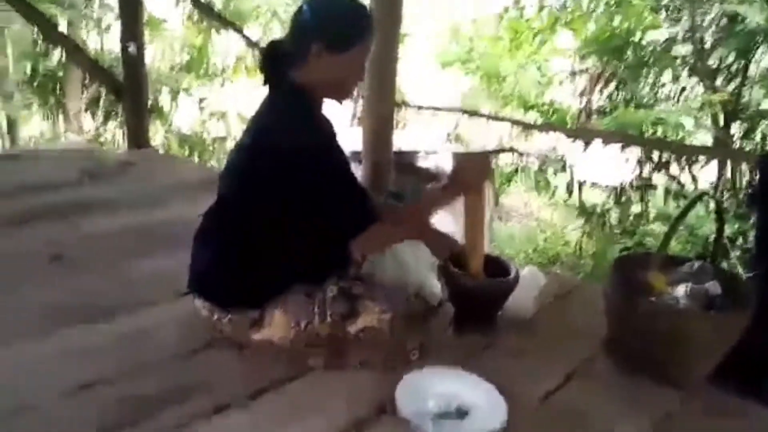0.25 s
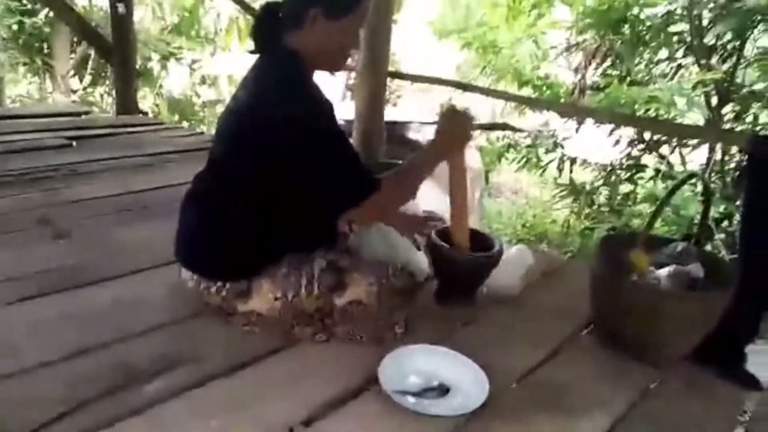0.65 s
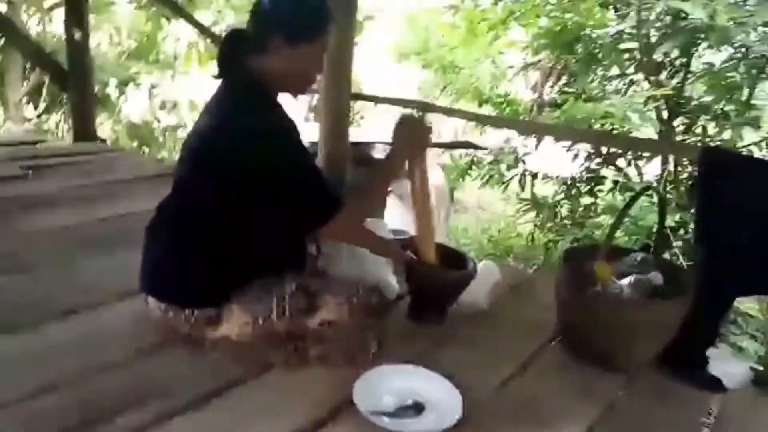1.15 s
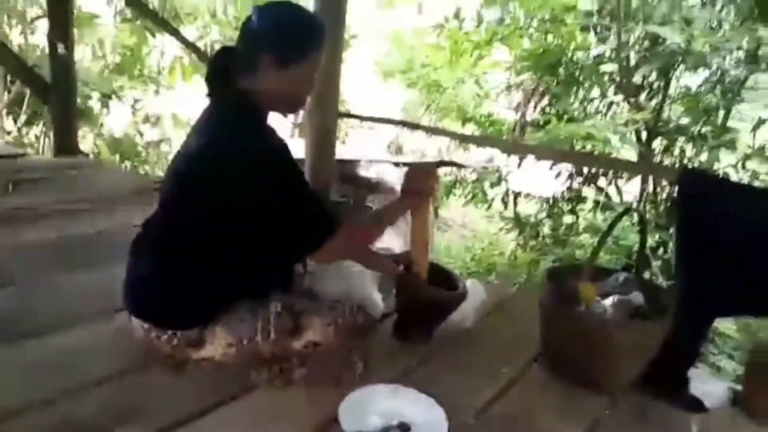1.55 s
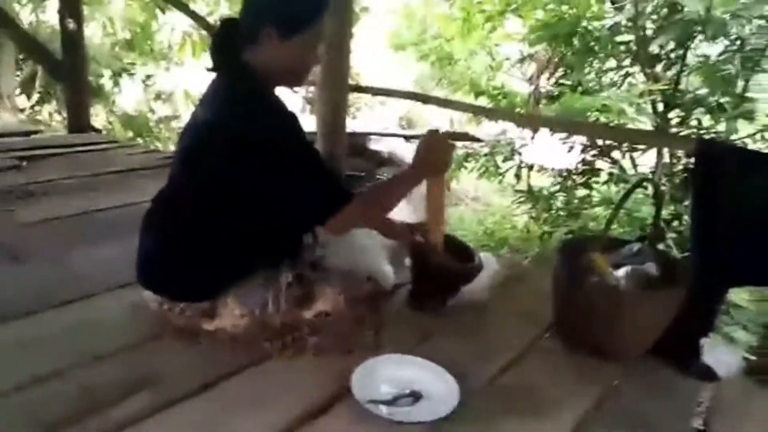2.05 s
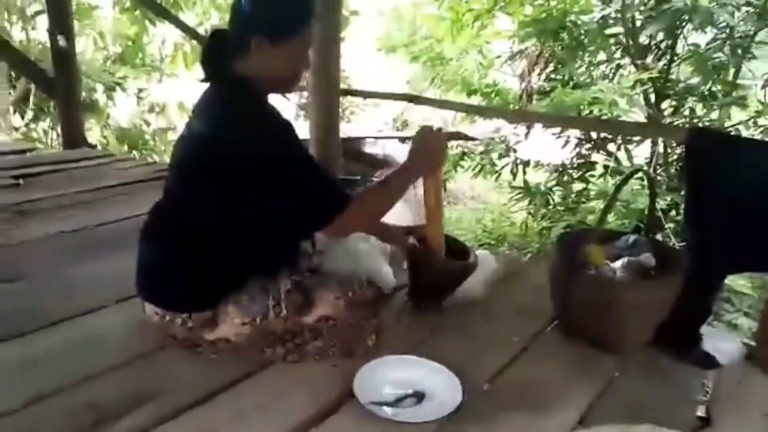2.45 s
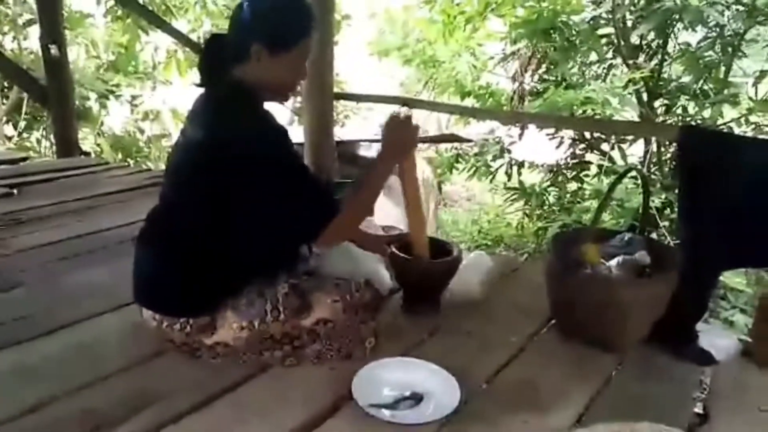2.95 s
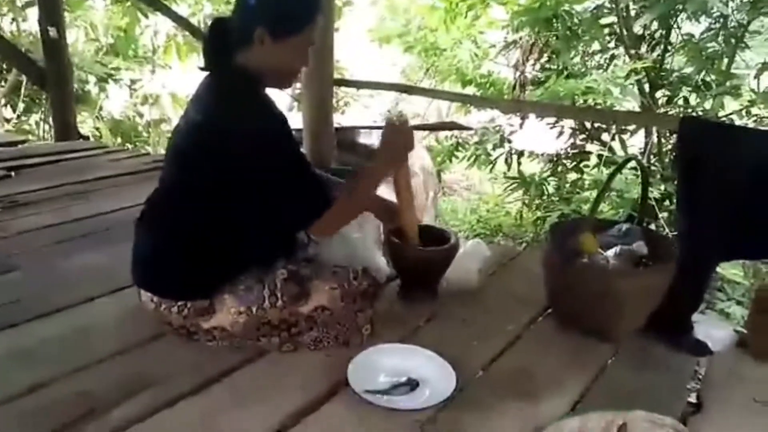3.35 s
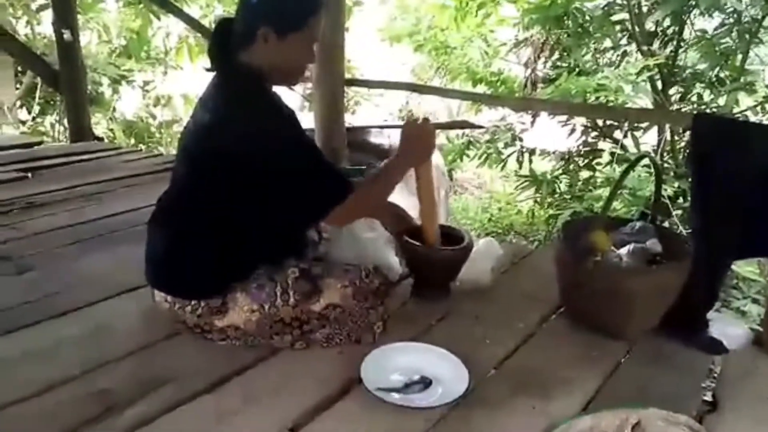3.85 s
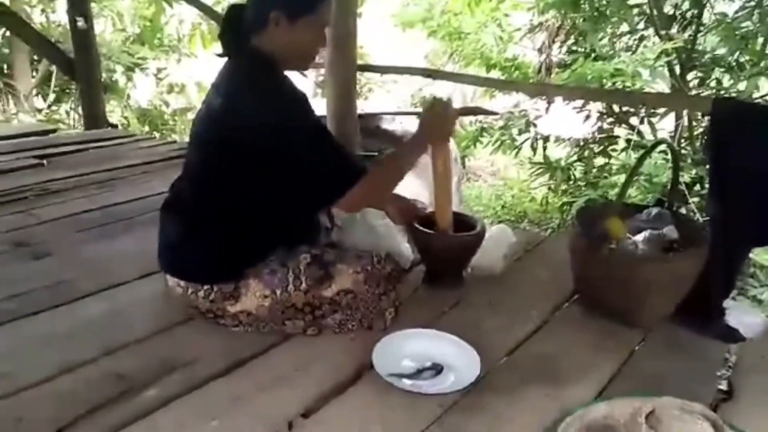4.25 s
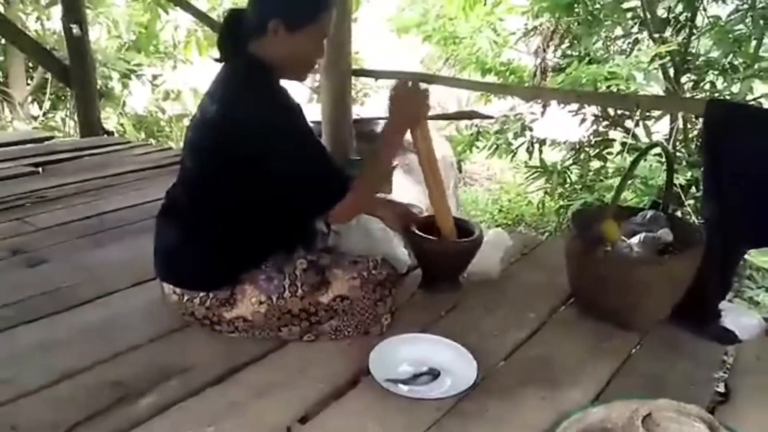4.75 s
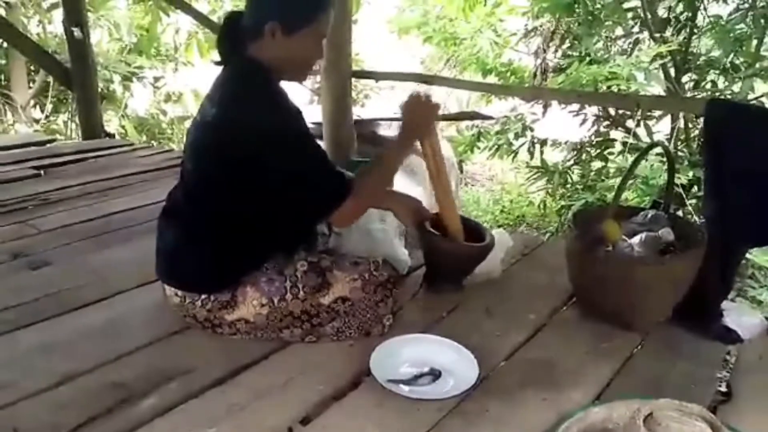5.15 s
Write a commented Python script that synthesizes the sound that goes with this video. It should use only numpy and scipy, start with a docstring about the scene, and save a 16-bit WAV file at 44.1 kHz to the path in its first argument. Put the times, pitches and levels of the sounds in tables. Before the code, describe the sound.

Close to a stereo microphone, slightly right, a wooden pestle pounds moist food in a clay mortar. About three strokes a second crunch and end in dull thuds that shake loose floor planks. Some strokes knock sharply on clay, loudest near 2.4 seconds. Fine grains hiss between blows; a tiny bird chirps far off in the later part, in quiet open air.

```python
"""Pounding food in a clay mortar

A wooden pestle pounds moist food on the plank floor of an open hut, a little right of the microphone pair.
Each stroke crunches through the food (bursts of tiny clicks) and ends in a thud (noise and board modes);
some strokes knock on the clay (mortar modes). Between strokes grains hiss as food settles, lifts or is scraped.
The roof gives a short echo (fading noise); a bird slurs far off (gliding sines); the air is faint noise."""
import sys
import numpy as np
from scipy import signal
from scipy.fft import rfft, irfft
from scipy.io import wavfile

SR = 44100
rng = np.random.default_rng(int(sys.argv[2]) if len(sys.argv) > 2 else 0)


def output_pcm(signal):
    """Save a mono or channel-first signal as 16-bit PCM at the path in sys.argv[1].

    Samples are clipped to [-1, 1] before scaling.
    """
    pcm = np.clip(np.atleast_2d(signal).T, -1, 1) * 32767
    wavfile.write(sys.argv[1], SR, np.round(pcm).astype(np.int16))


N = 238492
TIME = np.arange(N) / SR
AFTER = TIME[:SR // 2]   # time since a blow, s

# The pestle strokes. Each row: time the pestle meets the food in seconds, time to sink through it in seconds,
# entry crunch in dB, its treble in dB, deep crunch in dB, its treble in dB, entry jolt in dB,
# final thud in dB (before the shudder lift), thud softness cut in Hz, floor boom in dB, rustle of the lift in dB.
STROKES = [(0.621, 0.022, -46, 2, -44, -3.5, -44.5, -44, 1010, -49, -73.5),
           (0.990, .044, -67.5, 12, -54, 4.5, -66, -73, 500, -55.5, -96),
           (1.341, .042, -52, -11, -41.5, 4.5, -56, -39, 935, -42, -68.5),
           (1.718, .011, -41, 7.5, -41, -3, -53, -37.5, 650, -39, -65.5),
           (2.075, 0.015, -53, 12.5, -43, 5, -60, -43, 1100, -46.5, -76),
           (2.443, 0.025, -30, 3, -36.5, 6.5, -29.5, -42, 609, -48, -66),
           (2.790, .039, -55, 1, -43.5, -1.5, -44, -45, 720, -46.5, -74),
           (3.152, 0.024, -52.5, 2, -41, 4, -50, -38, 916, -48.5, -95),
           (3.502, 0.037, -57, 7, -48, 6, -66.5, -45, 1101, -45.5, -79),
           (3.847, .047, -54.5, 8.5, -47, 0, -52.5, -54.5, 666, -52.5, -75),
           (4.198, .038, -48, 1, -47.5, 12, -56, -48.5, 390, -49.5, -70.5),
           (4.568, .043, -48, -2.5, -44, -3.5, -51, -47, 440, -49.5, -71),
           (4.982, 0.021, -29.5, -1.5, -40.5, -4.5, -37.5, -40, 780, -48.5, -77),
           (5.348, 0.012, -37.5, -2.5, -37, -14, -52, -37.5, 805, -41, -76)]
# Light touches between strokes; the first row is the fading end of an earlier thud. Each row: start in seconds,
# crunch in dB, jolt in dB (before the shudder lift).
TOUCHES = [(0.002, -65, -59.5), (0.485, -54, -58), (1.123, -60.5, -65), (1.685, -63, -80),
           (2.243, -66, -73), (3.091, -61, -50.5), (3.255, -59, -58.5), (3.698, -63, -65.5),
           (4.005, -65.5, -78), (4.31, -56, -68), (5.249, -70, -55.5)]
# Spectrum of crushed food close by. Each row: frequency in Hz, relative density in dB per Hz.
CRUNCH_COLOUR = [(100, -10), (300, -1.5), (800, -1), (1400, -0.5), (2300, 3), (3200, -1), (4500, -1.5),
                 (6500, 0), (9000, -4), (11000, -17), (13000, -26.5)]
# Spectrum of sliding food and dry snaps. Each row: frequency in Hz, relative density in dB per Hz.
RUSTLE_COLOUR = [(100, -5.5), (400, 4.5), (1200, 2.5), (2400, 6), (3600, 3), (6500, 3.5), (9500, 1),
                 (11500, -7), (13000, -16.5)]


def crunches(split_hz=3000):
    """The food cracks as the pestle enters; fibres burst in a deep swell as it sinks in, then die away."""
    entry_swell_s, entry_t60 = .005, 0.12   # the skin of the food gives at once
    crush_swell_share, crush_t60 = 0.46, .125   # swell as a share of the sinking time; decay in s
    touch_t60, touch_treble_db = 0.092, 1.5
    burst = grains(CRUNCH_COLOUR, per_s=3500, spread_db=3.0, shift_db=2.0, clump_db=2.24)
    coarse = low_pass(burst, split_hz, order=1)
    fine = burst - coarse

    # each burst: peak s, level dB, swell s, t60 s, treble dB
    bursts = [(s + entry_swell_s, level_db, entry_swell_s, touch_t60, touch_treble_db)
              for s, level_db, _ in TOUCHES]
    for s, sink, entry_db, entry_treble_db, crush_db, crush_treble_db, *_ in STROKES:
        bursts.append((s + entry_swell_s, entry_db, entry_swell_s, entry_t60, entry_treble_db))
        bursts.append((s + sink, crush_db, crush_swell_share * sink, crush_t60, crush_treble_db))

    coarse_power, fine_power = np.zeros(N), np.zeros(N)
    for s, level_db, swell_s, t60, treble_db in bursts:
        power = (from_db(level_db) * surge(s, swell_s, t60)) ** 2
        coarse_power += power
        fine_power += power * from_db(treble_db) ** 2
    return coarse * np.sqrt(coarse_power) + fine * np.sqrt(fine_power)


def grains(spectrum, per_s, spread_db, shift_db, clump_db):
    """Tiny uneven ruptures come in clumps; their colour shifts as the pestle moves through the bowl."""
    sizes_db = spread_db * np.minimum(rng.exponential(1, (4, N)), 4)
    sizes = from_db(sizes_db) * rng.choice([-1, 1], (4, N))
    happens = rng.random((4, N)) < per_s / SR
    clicks = (sizes * happens).reshape(2, 2, N)
    edges_hz = np.geomspace(90, 14000, 19)
    pair = 0
    for k, (low_hz, high_hz) in enumerate(zip(edges_hz, edges_hz[1:])):
        # neighbouring bands take different clicks, and each band drifts in level
        pair = pair + band_pass(clicks[k % 2], low_hz, high_hz) * from_db(shift_db * drift(45))
    coloured = stereo(*[colour(draw, spectrum) for draw in pair])
    return rms_one(coloured * from_db(clump_db * drift(260)))


def thuds(least_rise_s=0.0027, mash_t60=.11, plank_t60=0.2, plank_hz=350, boom_rise_s=.009,
          shudder_db=4.5, lowest_hz=42, highest_hz=1500):
    """The packed food stops the pestle: loose planks shudder, the floor booms, the mortar rocks back once."""
    # Modes of the plank floor. Each row: frequency in Hz, relative level in dB, t60 in seconds.
    boards = [(53, -11, 0.71), (70, -3.5, 0.31), (80, -4.5, 0.6), (115, -9.5, 0.53), (156, -11.5, 0.33),
              (219.3, -4.5, .2), (263.6, -12, 0.17)]
    # Spectrum of the shudder before softening. Each row: frequency in Hz, relative density in dB per Hz.
    thud_colour = [(40, -17.5), (100, -15.5), (160, -10), (225, 1.5), (280, -4), (350, -8.5), (550, -5),
                   (1000, -10), (3000, -3), (12000, -39)]
    stop_lag = 1.25   # the pestle comes to rest after this many sinking times
    stop_rise_share = 0.17   # the thud's build-up lengthens by this share of the sinking time
    rock_s, rock_db, rock_cut_hz, rock_boom_db = .066, -13, 380, -7.5   # delay, levels against the thud

    boom = 0
    for k, (hz, db, t60) in enumerate(boards):
        boom = boom + from_db(db) * np.sin(2 * np.pi * hz * AFTER) * fade(AFTER, t60) * (-1) ** k
    boom = boom * (1 - np.exp(-AFTER / boom_rise_s))
    boom = band_pass(boom, lowest_hz, highest_hz)   # the boom is kept out of the deepest bass

    # each blow: start s, level dB, softness cut Hz, boom dB, rise s
    blows = [jolt(s, jolt_db) for s, _, jolt_db in TOUCHES]
    for s, sink, *_, jolt_db, thud_db, soft_hz, boom_db, _ in STROKES:
        stop = s + stop_lag * sink
        rise_s = least_rise_s + stop_rise_share * sink
        blows.append(jolt(s, jolt_db))
        blows.append((stop, thud_db, soft_hz, boom_db, rise_s))
        blows.append((stop + rock_s, thud_db + rock_db, rock_cut_hz, boom_db + rock_boom_db, rise_s))

    out = np.zeros((2, N))
    for s, level_db, soft_hz, boom_db, rise_s in blows:
        shudder = low_pass(noise(thud_colour, len(AFTER)), soft_hz)
        shudder = shudder / np.std(shudder[:, :SR // 25])   # level set by the first 40 ms
        planks = low_pass(shudder, plank_hz, order=1)
        mash = shudder - planks
        body = planks * fade(AFTER, plank_t60) + mash * fade(AFTER, mash_t60)
        body = body * (1 - np.exp(-AFTER / rise_s))
        add(out, s, from_db(level_db + shudder_db) * body + from_db(boom_db) * boom)
    return out


def jolt(s, level_db, rise_s=0.0064):
    """A passing push on the mortar, brighter the harder it is: (s, level dB, softness cut Hz, boom dB, rise s)."""
    medium_db, medium_cut_hz, cut_factor_per_db = -49, 430, 1.08
    boom_db = level_db - 6
    cut_hz = medium_cut_hz * cut_factor_per_db ** (level_db - medium_db)
    return s, level_db, cut_hz, boom_db, rise_s


def knocks(scatter_db=0.5, crack_db=-7, crack_t60=.11, grit_db=3, contact_s=0.00092, belly_hz=650,
           focus_octaves=0.22):
    """Wood on clay rings the mortar's modes; a cushion of food makes the contact soft and dull."""
    # Pestle meets clay. Each row: start in seconds, level in dB, contact brightness cut in Hz,
    # lift of the belly modes in dB, favoured frequency in Hz, its lift in dB, ring length as a factor.
    strikes = [(0.484, -47.5, 8900, -21, 3100, 24, 0.27), (0.619, -47.5, 4030, 8.5, 2850, 20, 0.97),
               (1.3409, -23, 8100, -7.5, 3400, 13, 0.54), (1.348, -32.5, 2500, -6, 1500, 20, 0.47),
               (1.734, -37, 2600, -23, 1716, 15, 0.76), (2.4491, -15, 7000, 3, 2220, 7, 0.51),
               (2.4593, -23.5, 8000, -13.5, 4900, 16.5, 0.33), (2.469, -35.5, 9000, 7, 2800, 20.5, 0.45),
               (2.591, -46.5, 3480, -10, 2260, 11.5, 0.41), (2.789, -43.5, 2000, 1, 797, 15, 0.58),
               (3.154, -29.5, 2066, -1, 1500, 13.5, 0.92), (4.070, -56, 6060, -10, 1480, 10.5, 0.55),
               (4.198, -23.5, 6500, -10, 2530, 4, 0.69), (4.568, -46, 1730, 6.5, 776, 18.5, 0.66),
               (4.986, -32.5, 6000, 3.5, 4880, 6, 0.72), (5.363, -37.5, 1800, 9.5, 890, -10, 1)]
    # Modes of the mortar, damped by the food. Each row: frequency in Hz, level in dB before the lifts of
    # each knock, t60 in seconds before its ring factor.
    mortar = [(215, -16.5, 0.014), (565.6, -8, 0.093), (734.5, -20, 0.23), (778, -23, 0.37),
              (838, -11, 0.11), (950, -16.5, 0.069), (1083, -13, 0.11), (1268, -10.5, 0.04),
              (1460, -12, 0.025), (1632, -13.5, 0.055), (1955, -12, 0.039), (2083, -10, 0.11),
              (2220, -10, 0.15), (2304, -6, 0.066), (2405, -4.5, .05), (2570, -10.5, 0.12),
              (3006, -18.5, 0.011), (3614, -11.5, 0.038), (3920, -20.5, 0.047), (4250, -18, 0.03),
              (4330, -14, 0.072), (4510, -8.5, 0.081), (5000, -13, 0.11), (5110, -9.5, 0.046),
              (5785, -4.5, 0.083), (5650, -12.5, .045), (6240, -3.5, 0.09), (6970, -13, 0.11),
              (8690, -3, 0.077), (7950, -21, 0.046)]
    out = np.zeros((2, N))
    hz, mode_db, t60 = np.transpose(mortar)
    for s, level_db, bright_hz, belly_db, focus_hz, focus_db, ring in strikes:
        # where the pestle lands decides which modes take up most
        octaves_off = np.log2(hz / focus_hz)
        place_db = belly_db * (hz < belly_hz) + focus_db * np.exp(-(octaves_off / focus_octaves) ** 2)
        uneven_db = scatter_db * rng.standard_normal(len(hz))
        gains = from_db(mode_db + place_db + uneven_db) * (-1) ** np.arange(len(hz))

        # every mode radiates its own way, so it reaches one side a little earlier
        phase = 2 * np.pi * hz[:, None] * AFTER
        dying = fade(AFTER, ring * t60[:, None])
        side_gains = gains * rng.choice([-1, 1], len(hz))
        tone = stereo(gains @ (np.sin(phase) * dying), side_gains @ (np.cos(phase) * dying))

        # bits caught under the pestle crack unevenly and sound through the same wall
        unevenness = rms_one(from_db(grit_db * drift(500)))[:len(AFTER)]
        grit = noise(CRUNCH_COLOUR, len(AFTER)) * unevenness
        grit = np.array([colour(side, sorted(zip(hz, place_db))) for side in grit])
        crack = from_db(crack_db) * grit * fade(AFTER, crack_t60 * ring)

        contact = 1 - np.exp(-AFTER / contact_s)
        add(out, s, from_db(level_db) * low_pass((tone + crack) * contact, bright_hz))
    return out


def snaps(t60=0.018, snap_db=-8):
    """A brittle bit cracks: a dry, quickly fading burst of noise."""
    # Small dry snaps. Each row: start in seconds, level in dB before snap_db is added.
    cracks = [(0.485, -39), (0.5248, -38)]
    out = np.zeros((2, N))
    for s, level_db in cracks:
        add(out, s, from_db(level_db + snap_db) * noise(RUSTLE_COLOUR, len(AFTER)) * fade(AFTER, t60))
    return out


def rustle(hiss_hz=7500, brisk_db=-72, brightening=0.22):
    """Food slides round the bowl in a fine hiss of grains; the brisker the slide, the brighter."""
    level_db = sliding_db()
    hiss = grains(RUSTLE_COLOUR, per_s=9000, spread_db=0.5, shift_db=2.5, clump_db=2.0)
    dull = low_pass(hiss, hiss_hz, order=1)
    treble_gain = from_db(brightening * (level_db - brisk_db))
    return from_db(level_db) * (dull + (hiss - dull) * treble_gain)


def sliding_db(rest_db=-88):
    """Food on the move: it settles after each stroke, follows the lifting pestle and is scraped along the wall."""
    # The pestle drags food along the bowl's wall. Each row: start in seconds, length in seconds, level in dB.
    scrapes = [(0.602, 0.046, -66.5), (1.957, 0.14, -51.5), (2.585, 0.16, -63), (3.801, .06, -64.5)]
    scrape_swell_s, scrape_release_s = 0.041, .018
    settle_db, settle_t60 = -15.5, 0.58   # level against the deep crunch
    lift_after_s, lift_width_s = .2, .07   # the pestle is drawn out again
    power = from_db(rest_db) ** 2
    for s, sink, _, _, crush_db, *_, lift_db in STROKES:
        settling = from_db(crush_db + settle_db) * surge(s + sink, sink, settle_t60)
        widths_off = (TIME - s - lift_after_s) / lift_width_s
        lifting = from_db(lift_db) * np.exp(-np.minimum(widths_off ** 2, 20))
        power = power + settling ** 2 + lifting ** 2
    for s, length, level_db in scrapes:
        release = np.exp(-np.clip(TIME - s - length, 0, 1) / scrape_release_s)
        power = power + (from_db(level_db) * swell(s, scrape_swell_s) * release) ** 2
    return 10 * np.log10(power)


def bird(waver=0.034, scatter_t60=0.061):
    """A small bird far off slurs up and down in wavering sines; the leaves blur its call."""
    # Calls of the distant bird. Each row: start in seconds, level in dB.
    calls = [(4.051, -66.5), (4.384, -69), (4.722, -65.5)]
    # The two slurs of a call. Each row: delay in seconds, length in seconds, start and end in Hz before waver.
    slurs = [(0, .045, 4950, 5940), (0.039, 0.063, 6860, 4780)]
    out = np.zeros((2, N))
    for s, level_db in calls:
        for delay, length, start_hz, end_hz in slurs:
            size = round(length * SR)
            hz = np.linspace(start_hz, end_hz, size) * (1 + waver * drift(330)[:size])
            chirp = np.sin(2 * np.pi * np.cumsum(hz) / SR) * np.hanning(size)
            leaves = rng.standard_normal((2, len(AFTER))) * fade(AFTER, scatter_t60)
            leaves = leaves / np.linalg.norm(leaves[0])
            blurred = signal.fftconvolve(chirp[None], leaves, axes=1)
            add(out, s + delay, from_db(level_db) * blurred)
    return out


def hut(x, first_echo_s=0.016):
    """Diffuse echo from roof and floor, as fading noise in octave bands; the lows linger."""
    # Decay of the echo under the roof. Each row: frequency in Hz, t60 in seconds.
    echo_t60 = [(80, 0.93), (250, 0.71), (700, 0.067), (2500, 0.17), (12000, .18)]
    # Strength of the echo. Each row: frequency in Hz, level in dB.
    echo_db = [(80, -9), (250, -14), (700, -19.5), (2500, -13), (12000, -18)]
    t, tail = TIME[:SR], 0
    for hz in 62.5 * 2 ** np.arange(8.):
        band = band_pass(stereo(*rng.standard_normal((2, SR))), hz / np.sqrt(2), hz * np.sqrt(2))
        shape = fade(t, at_hz(echo_t60, hz)) * (t > first_echo_s)
        tail = tail + from_db(at_hz(echo_db, hz)) * band * shape / np.linalg.norm(shape)
    return signal.fftconvolve(x, tail, axes=1)[:, :N]


def outdoor_air(level_db=-69):
    """The nearly still air outside: faint steady noise, strongest in the bass."""
    # Spectrum of the air. Each row: frequency in Hz, relative density in dB per Hz.
    air_colour = [(20, -29.5), (45, -5), (70, 0.5), (110, -1), (152, -7), (208, -11), (316, -18.5),
                  (676, -26), (1230, -29.5), (2440, -26.5), (3000, -30), (6410, -28.5), (9010, -33.5),
                  (13000, -45)]
    return from_db(level_db) * noise(air_colour, N)


def stereo(mid, side):
    """Two unrelated draws of a sound become left and right: alike in the bass, less so in the treble."""
    # Likeness of the microphone pair's channels. Each row: frequency in Hz, correlation from 0 to 1.
    likeness = [(60, 0.99), (500, 0.88), (1200, 0.32), (4000, 0.21), (8000, 0.19), (13000, 0.46)]
    alike = [(hz, np.clip(c, .01, .995)) for hz, c in likeness]
    mid = colour(mid, [(hz, 10 * np.log10((1 + c) / 2)) for hz, c in alike])
    side = colour(side, [(hz, 10 * np.log10((1 - c) / 2)) for hz, c in alike])
    return np.array([mid + side, mid - side])


def noise(spectrum, size):
    """Coloured stereo noise of unit power."""
    return rms_one(stereo(*[colour(rng.standard_normal(size), spectrum) for channel in range(2)]))


def colour(x, spectrum, size=4096):
    """Causal (minimum-phase) filter with the given spectrum, made by folding its cepstrum."""
    gains = from_db(at_hz(spectrum, np.arange(size // 2 + 1) * SR / size))
    cepstrum = irfft(np.log(gains))
    cepstrum[1:size // 2] *= 2
    cepstrum[size // 2 + 1:] = 0
    response = irfft(np.exp(rfft(cepstrum)))
    return signal.fftconvolve(x, response)[:len(x)]


def low_pass(x, hz, order=2):
    """Butterworth low-pass."""
    return signal.sosfilt(signal.butter(order, min(hz, .45 * SR), fs=SR, output="sos"), x)


def band_pass(x, low_hz, high_hz):
    """Butterworth band-pass."""
    return signal.sosfilt(signal.butter(2, [low_hz, high_hz], "band", fs=SR, output="sos"), x)


def drift(per_s):
    """Random wander of unit power, in straight lines between per_s new values a second."""
    knots = np.arange(0, TIME[-1] + 1, 1 / per_s)
    return rms_one(np.interp(TIME, knots, rng.standard_normal(len(knots))))


def fade(t, t60):
    """Free decay, 60 dB in t60."""
    return np.exp(-np.log(1000) * t / t60)


def swell(s, swell_s):
    """Rises smoothly to 1 at time s and stays there."""
    return np.exp(-np.minimum((np.minimum(TIME - s, 0) / swell_s) ** 2, 20))


def surge(s, swell_s, t60):
    """Swells to a peak at time s, then dies away for a second."""
    return swell(s, swell_s) * fade(np.clip(TIME - s, 0, 1), t60)


def from_db(db):
    """Decibels to gain."""
    return 10 ** (np.asarray(db) / 20)


def rms_one(x):
    """Scale to unit power."""
    return x / np.sqrt(np.mean(x ** 2) + 1e-20)


def at_hz(points, hz):
    """Read a table on a log-frequency axis."""
    known_hz, values = np.transpose(points)
    return np.interp(np.log(np.maximum(hz, 1)), np.log(known_hz), values)


def add(track, s, sound):
    """Mix a stereo sound in at time s."""
    start = np.clip(round(s * SR), 0, N)
    track[:, start:start + sound.shape[1]] += sound[:, :N - start]


def scene():
    """Mortar, floor and bird with the hut's echo over faint outdoor air, leaning right at most frequencies."""
    # Lean of the microphone pair. Each row: frequency in Hz, left minus right in dB.
    lean = [(60, -3.5), (200, -2), (700, -2.5), (2200, -3), (4000, -0.6), (6000, 2.5), (8500, -7),
            (13000, -15)]
    sources = crunches() + thuds() + knocks() + snaps() + rustle() + bird()
    left, right = sources + hut(sources) + outdoor_air()
    # the right gain keeps the mean of the two channel gains at one
    right_db = [(hz, 20 * np.log10(2 / (1 + from_db(db)))) for hz, db in lean]
    return np.array([colour(colour(left, lean), right_db), colour(right, right_db)])


def record(dry):
    """A steep elliptic low-pass cuts off the top."""
    cutoff_hz = 13300
    return signal.sosfilt(signal.ellip(10, .2, 70, cutoff_hz, fs=SR, output="sos"), dry)


dry = scene()
out = record(dry)
output_pcm(out)
```